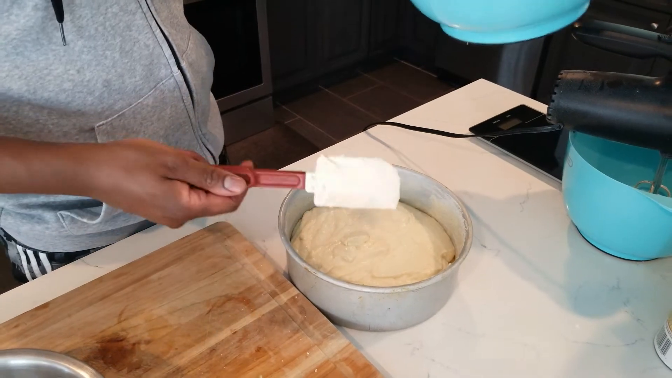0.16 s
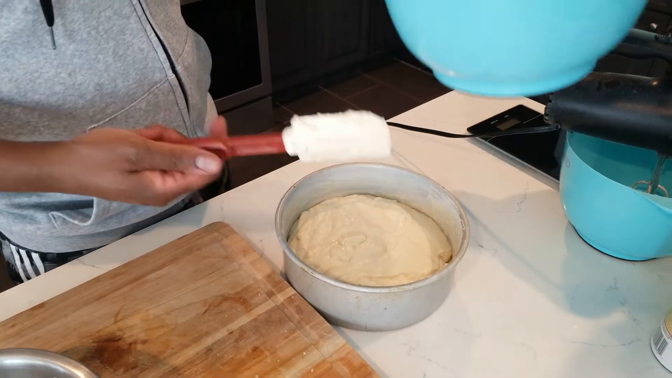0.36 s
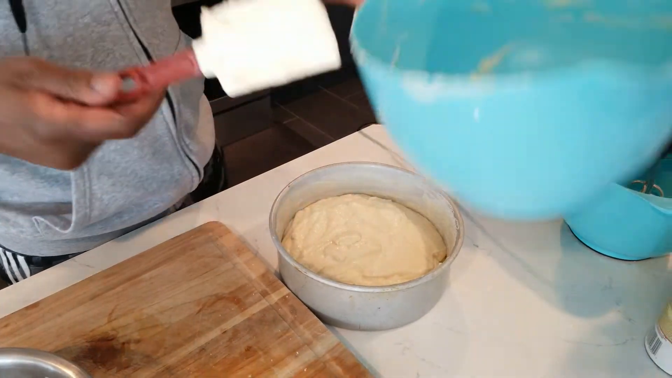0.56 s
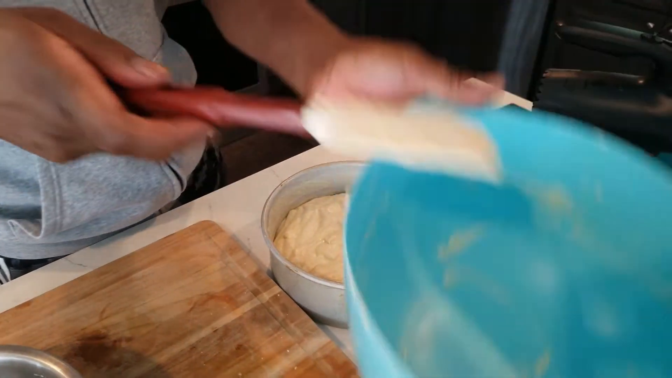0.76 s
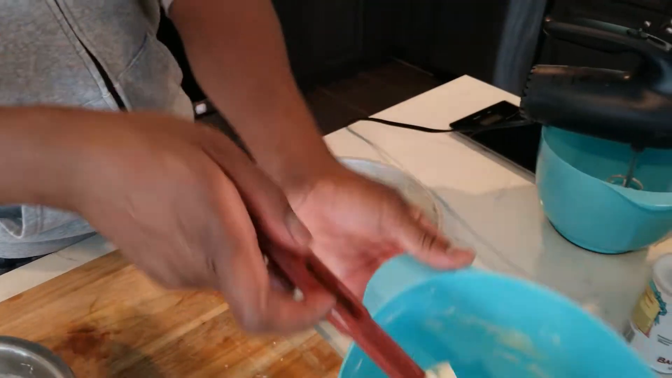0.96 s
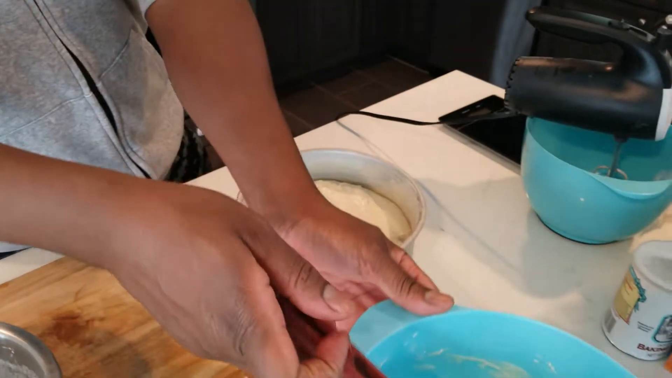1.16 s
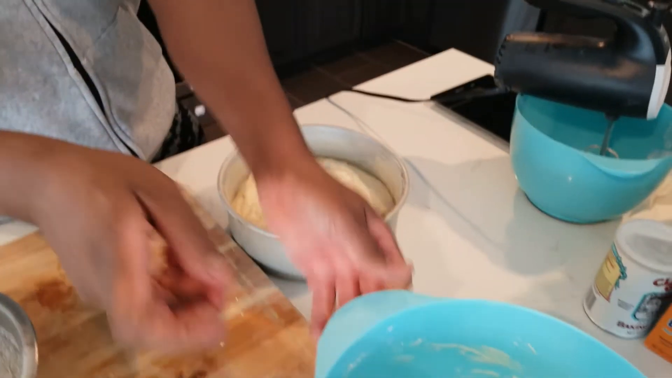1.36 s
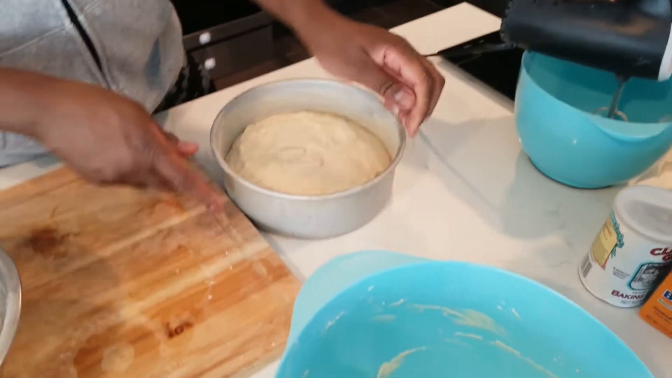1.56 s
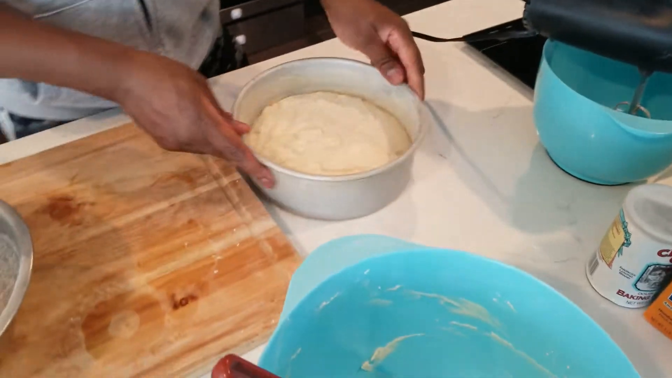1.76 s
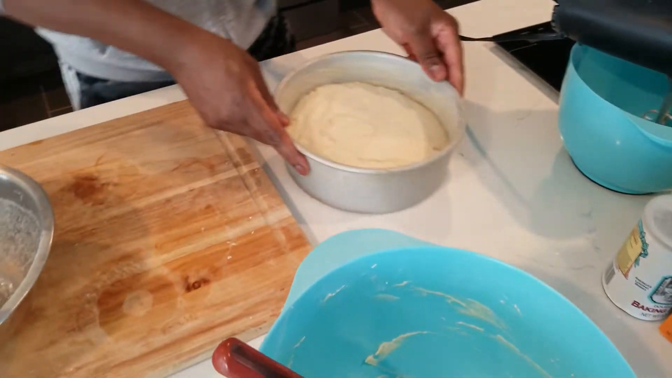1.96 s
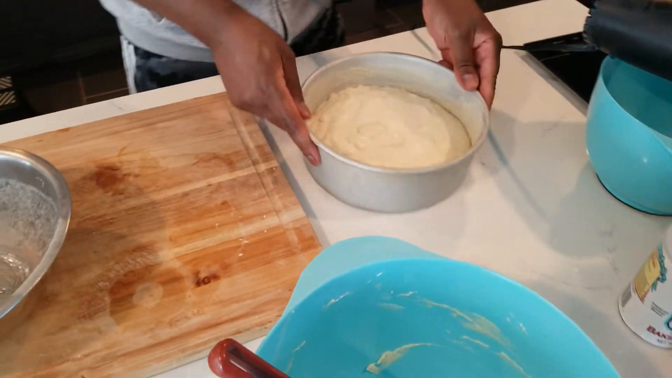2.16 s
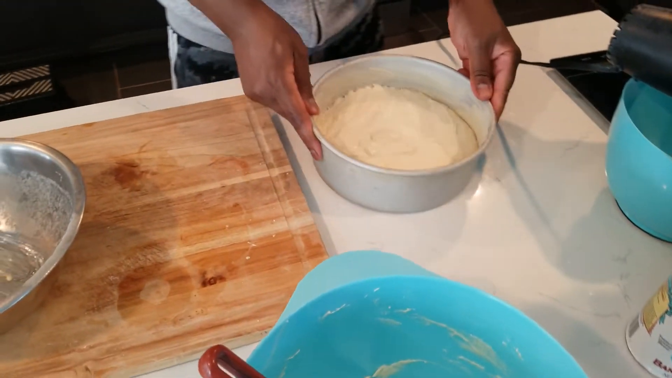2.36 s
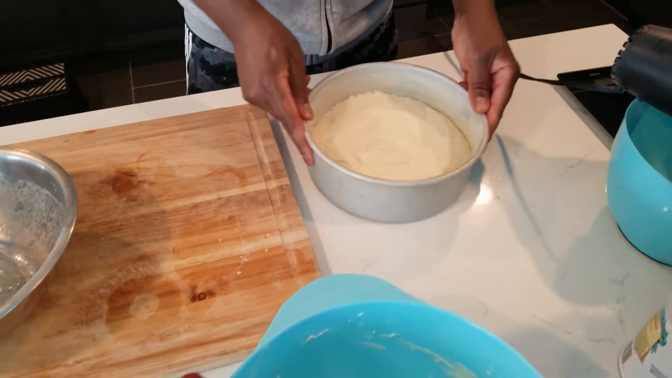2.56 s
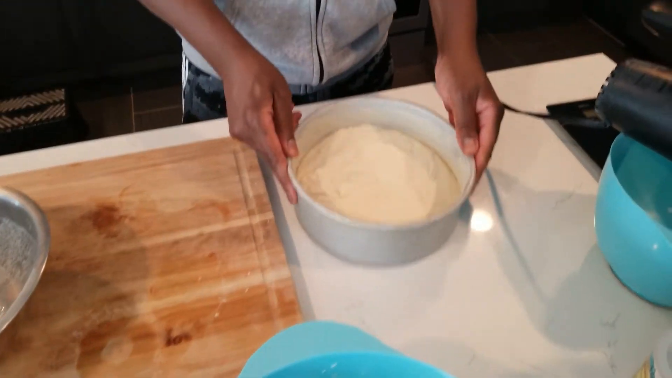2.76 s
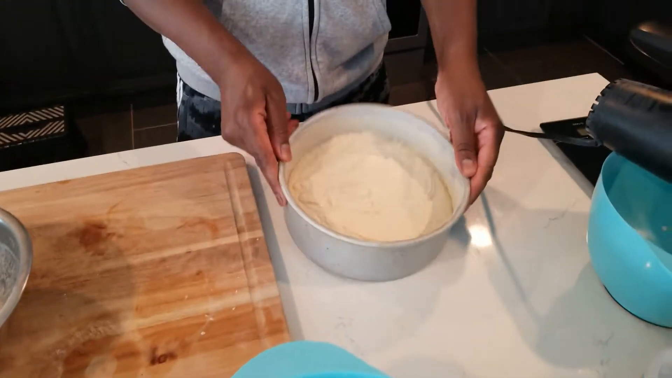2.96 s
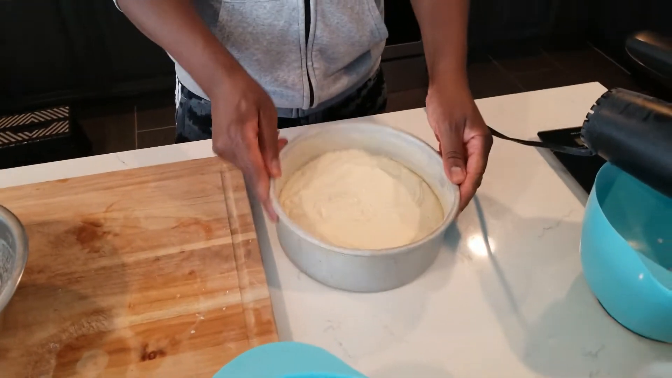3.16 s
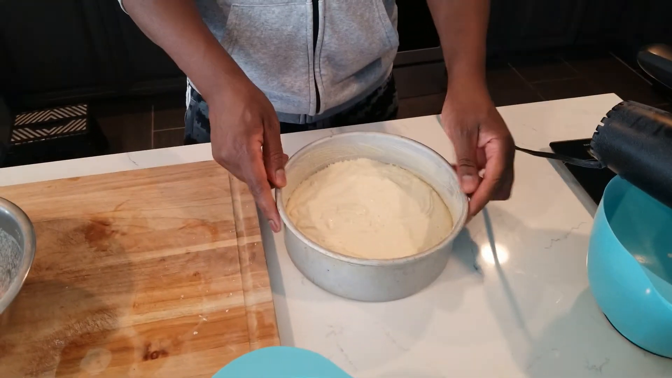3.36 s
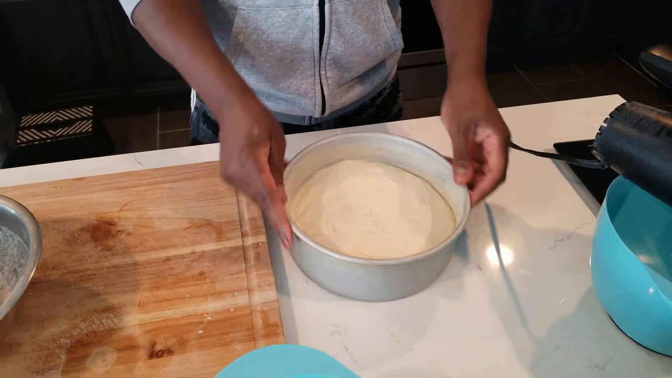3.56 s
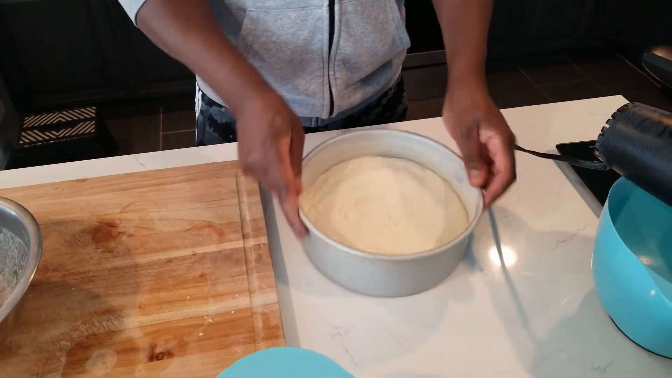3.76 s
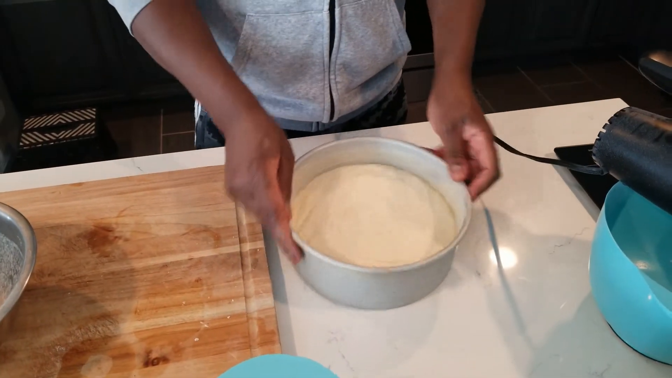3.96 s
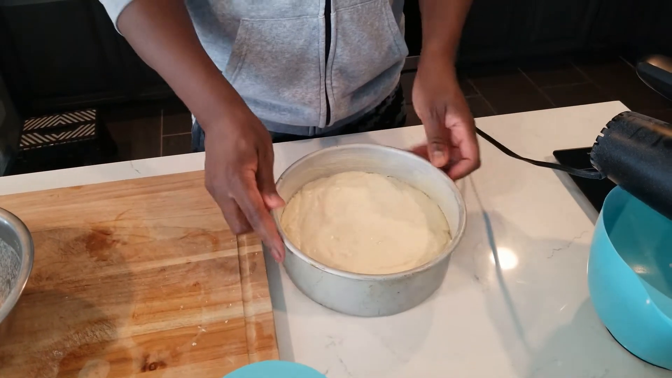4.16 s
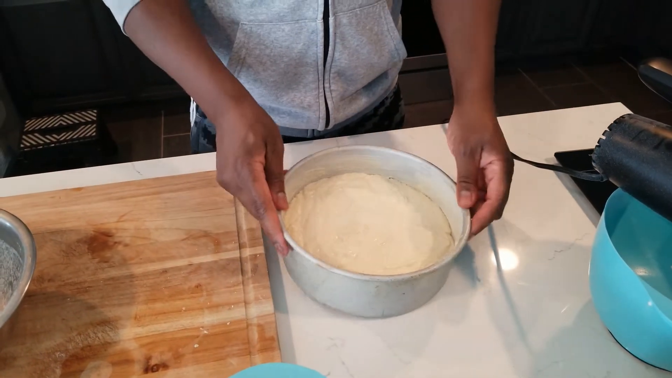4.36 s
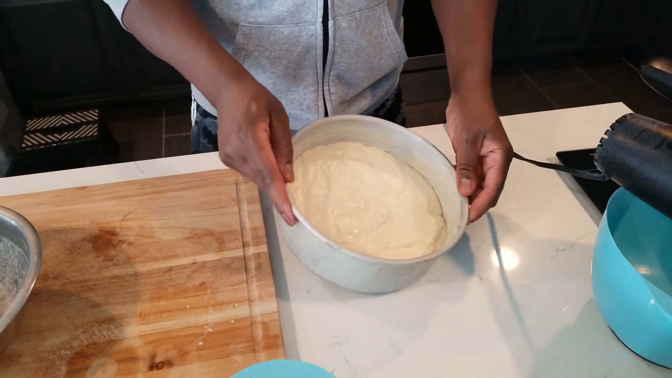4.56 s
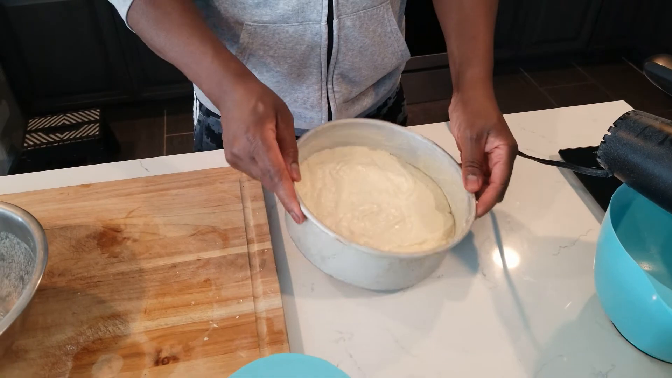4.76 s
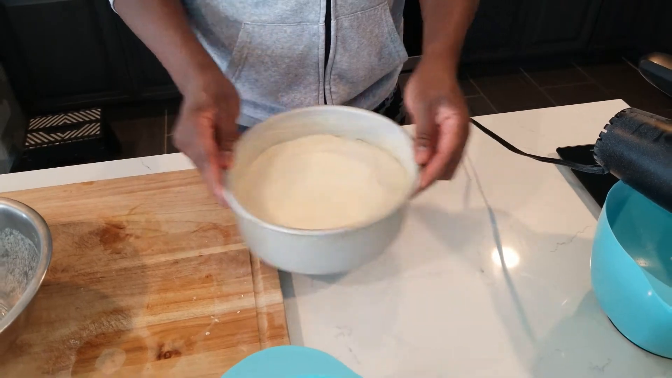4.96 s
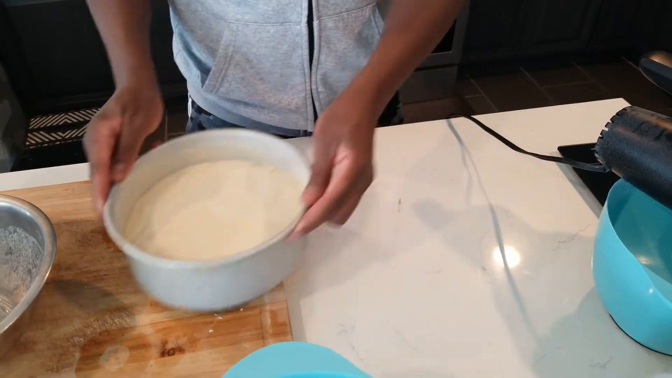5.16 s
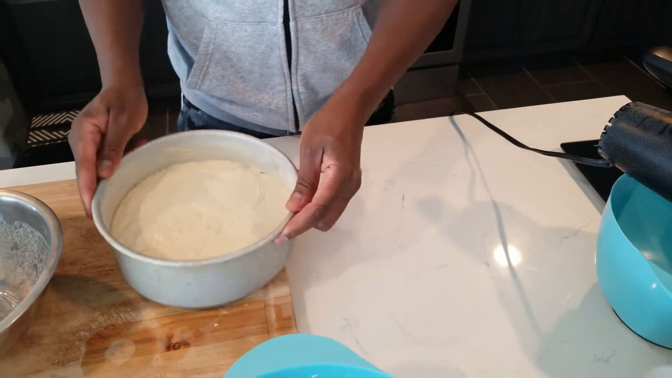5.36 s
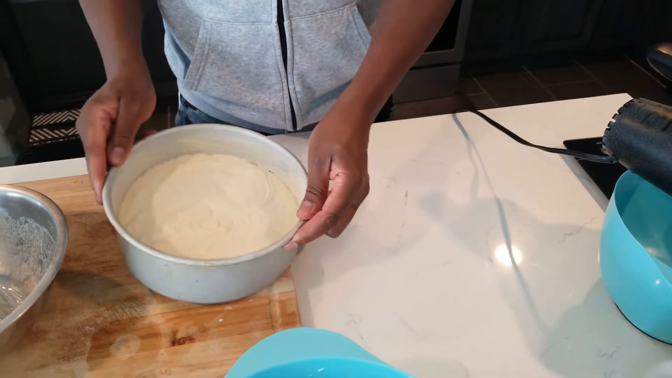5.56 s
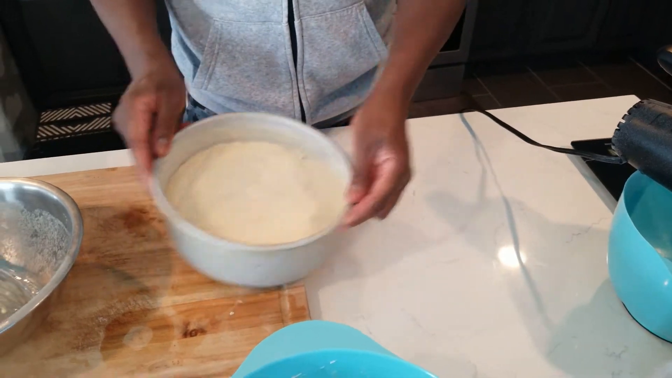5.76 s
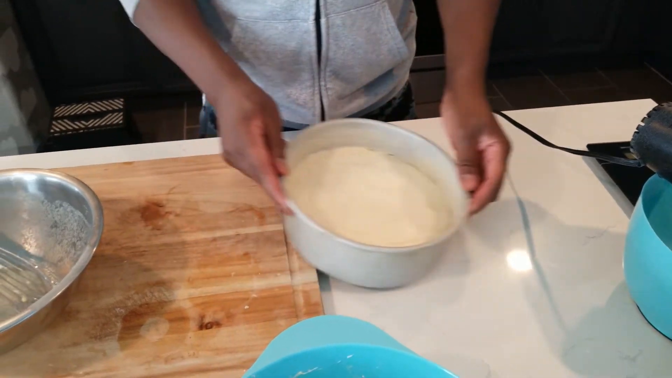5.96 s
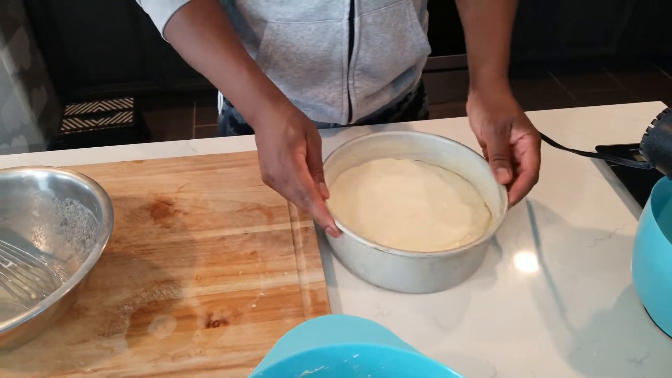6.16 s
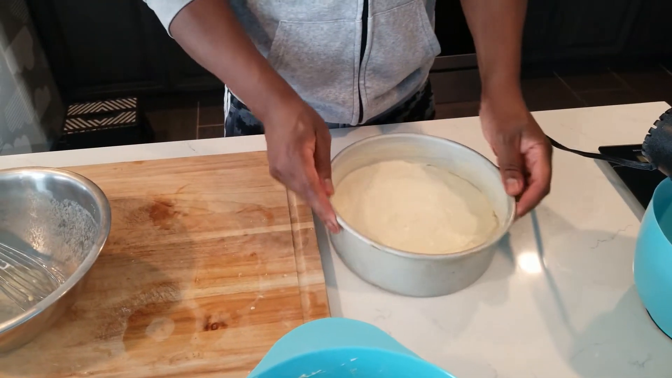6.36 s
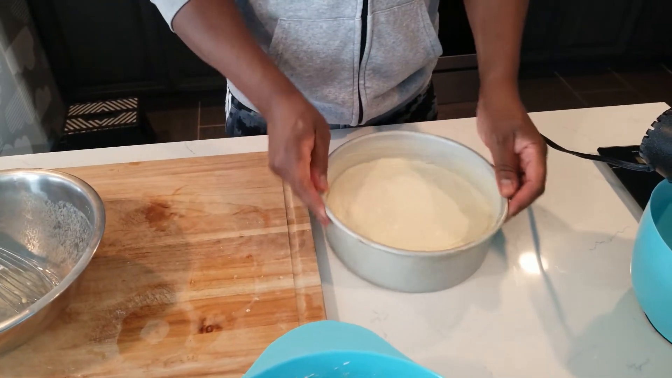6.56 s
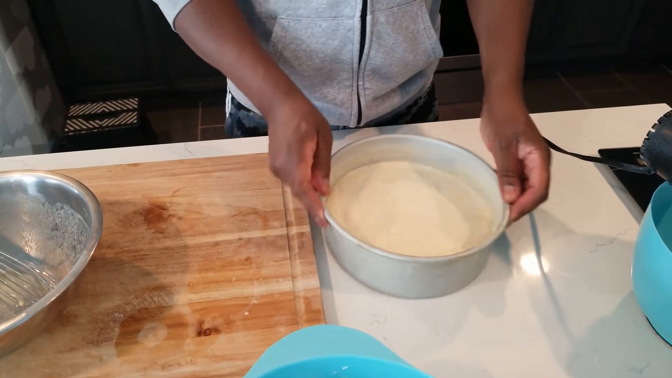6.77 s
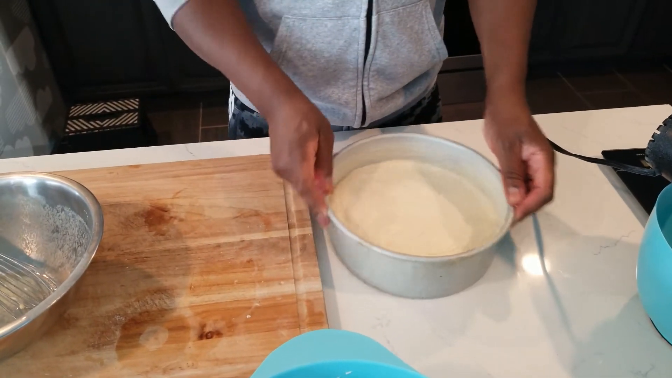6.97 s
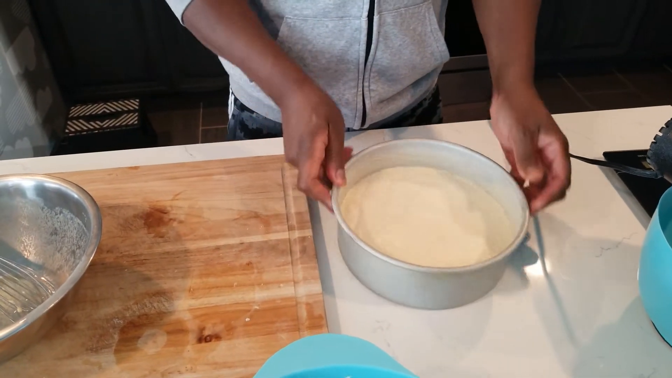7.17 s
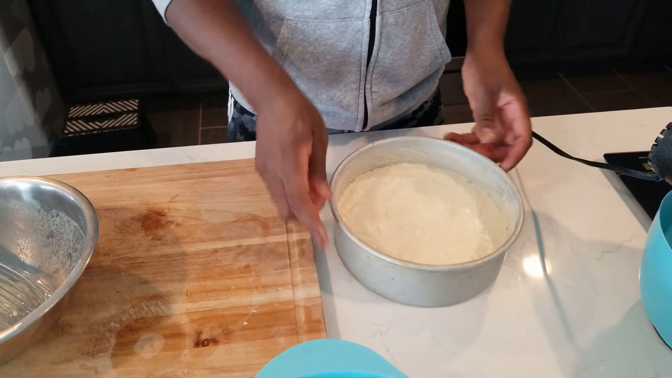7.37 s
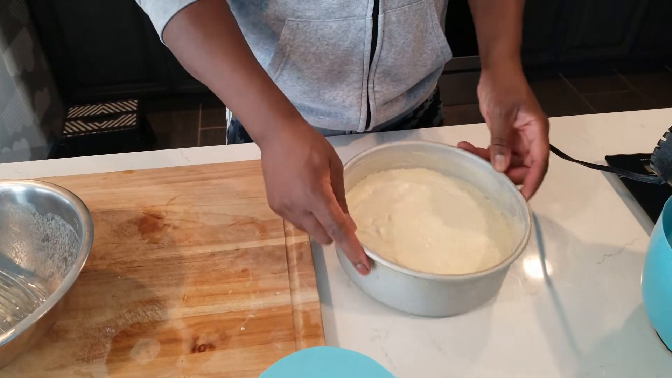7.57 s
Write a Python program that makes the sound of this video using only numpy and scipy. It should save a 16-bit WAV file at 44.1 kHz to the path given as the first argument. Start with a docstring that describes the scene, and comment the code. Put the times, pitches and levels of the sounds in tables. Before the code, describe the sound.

A rubber spatula squeaks softly around a plastic bowl. The bowl is set down with a hollow knock and the spatula drops with a clatter. A metal pan full of batter then slides and knocks sharply on a stone counter, clacks on a wooden board with a brief whisk rattle, and hits the stone again. Heard close up in an echoing kitchen with a faint fridge hum.

```python
"""A hard-walled kitchen, heard in stereo from a phone close to the counter; a fridge hums and whines
faintly throughout. First a rubber spatula sticks and slips round a plastic bowl; the bowl is set down
and the spatula dropped. Then a batter-filled metal pan is slid about, nudged and knocked on the stone
counter. Just after 5 s it lands on a wooden board and a whisk rattles as the board jumps. The pan is
knocked on the stone again and shifted a few last times. Every knock rings on in the room."""
import sys
import numpy as np
from scipy import signal
from scipy.fft import rfft, irfft, next_fast_len
from scipy.io import wavfile
from scipy.ndimage import uniform_filter1d

SR = 44100
rng = np.random.default_rng(int(sys.argv[2]) if len(sys.argv) > 2 else 0)


def store_pcm(level_fs):
    """Save levels as 16-bit WAV."""
    pcm = np.round(np.clip(level_fs, -1, 1) * 32767).astype(np.int16)
    wavfile.write(sys.argv[1], SR, np.atleast_2d(pcm).T)


N = 335160

# hiss of soft things rubbing (skin, cloth, rubber): f/Hz, width/Hz, level/dB
RUB_BANDS = [(3220, 2700, -9.5), (6630, 4900, -9), (9600, 980, 0), (13100, 17000, -5)]


def undb(db):
    """dB to gain."""
    return np.exp(np.asarray(db, float) * np.log(10) / 20)


def unit(x):
    """Scale to rms 1."""
    return x / np.sqrt(np.mean(x ** 2))


def resonate(x, peaks):
    """Pass through a sum of resonances of alternating sign (f/Hz, width/Hz, level/dB)."""
    n = next_fast_len(N)
    f = np.fft.rfftfreq(n, 1 / SR) + 1e-3
    shape = sum((-1) ** k * undb(db) / (1 + 1j * (f - hz ** 2 / f) / width)
                for k, (hz, width, db) in enumerate(peaks))
    return irfft(rfft(x, n) * shape, n)[..., :N]


def wide(mid, side):
    """The phone's two microphones hear alike below 600 Hz and part in the treble."""
    side = signal.sosfilt(signal.butter(2, 600, "high", fs=SR, output="sos"), side)
    return np.array([mid + side, mid - side])


def grit(per_s, spread_db):
    """Random tiny impacts of uneven size."""
    when, sign, size = rng.random((3, N))
    return unit((when < per_s / SR) * np.sign(sign - .5) * undb(-spread_db * np.log(1 - size)))


def strokes(table, attack_s, t60_s):
    """Rows (t/s, length/s, level/dB, ..) as one envelope per level column: rise, hold, die away."""
    t, gains = np.arange(N) / SR, 0
    for start, length, *db in table:
        rise = np.clip((t - start) / attack_s, 0, 1)
        fall = undb(-60 * np.maximum(t - start - length, 0) / t60_s)
        gains = gains + np.outer(undb(db), rise * fall)
    return gains


def ring(modes, t, tilt_db, detune, scatter_db=1.5):
    """Dying sines tilted by tilt_db an octave, peak 1; each blow weights and detunes them anew."""
    hz, db, t60 = np.transpose(modes)[..., None]
    weight, mistune = rng.standard_normal((2, len(modes), 1))
    gain = undb(db + tilt_db * np.log2(hz / 700) + scatter_db * weight)
    sines = np.sin(2 * np.pi * hz * (1 + detune * mistune) * t)
    y = np.sum(gain * sines * undb(-60 * t / t60), axis=0)
    return y / np.abs(y).max()


def blows(hits, modes, contact_s, crack_s, crack_hz, chatter_db, chatter_s, slab_tilt_db):
    """Each blow rings the object and the counter, cracks and chatters; rows: left, right, to the walls."""
    # the stone counter: f/Hz, level/dB, t60/s
    slab_modes = [(43, -22, .4), (95, -10, .1), (145, 0, .11), (190, -5, .07)]
    out, t = np.zeros((3, N + SR)), np.arange(SR // 3) / SR
    treble = signal.butter(1, [2400, crack_hz], "band", fs=SR, output="sos")
    radiation = signal.butter(2, 110.2, "high", fs=SR, output="sos")  # small objects give off little bass
    push = t * np.exp(-t / contact_s)  # a contact of finite length dulls the ring
    click = signal.sosfilt(treble, np.arange(len(t)) == 0) * np.sqrt(crack_s * SR / 2)
    settling, fade = np.exp(-t / chatter_s), np.cos(np.pi / 2 * t / t[-1])
    for start, ring_db, thud_db, crack_db, balance_db, *tilt_db in hits:
        noise = rng.standard_normal((4, len(t)))
        body = signal.fftconvolve(ring(modes, t, sum(tilt_db), detune=.015), push / push.sum())
        body = signal.sosfilt(radiation, body[:len(t)])
        chatter = wide(*signal.fftconvolve(body[None], noise[:2] * settling, axes=1)[:, :len(t)])
        chatter *= undb(chatter_db) / np.abs(chatter).max()
        thud = ring(slab_modes, t, slab_tilt_db, detune=.01)
        thud *= 1 - np.exp(-t / 0.008)  # the heavy slab takes a moment to move
        crack = signal.sosfilt(treble, noise[2:] * (np.exp(-t / crack_s) + 0.13 * settling))
        solid = undb(ring_db) * body + undb(thud_db) * thud
        near = solid + undb(ring_db) * chatter + undb(crack_db) * crack
        near *= undb([[balance_db / 2], [-balance_db / 2]])
        far = solid + undb(crack_db + 0.5) * click  # summed over all directions the crack is an even click
        i = int(start * SR)
        out[:, i:i + len(t)] += np.vstack([near, far]) * fade
    return out[:, :N]


def fridge():
    """Steady broad noise with a wavering hum and a thin whine that throbs once per turn of the motor."""
    # shape of the noise: f/Hz, relative level/dB
    spectrum = [(18, -35.5), (30, 5.5), (75, 3), (280, -3.5), (374, -8), (740, -14), (889, -23.5),
                (2900, -35.5), (4420, -26.5), (5450, -33.5), (9460, -36.5), (12600, -29), (16000, -39.5)]
    # the hum: f/Hz, level/dB, pitch wander as a share
    hum_tones = [(199.5, -68.5, 0.0054)]
    # the motor's whine: multiple of the shaft rate, level/dB
    harmonics = [(83, -97), (84, -91), (85, -81), (86, -91), (87, -89), (88, -97), (89, -96), (90, -96)]
    shaft_hz, t, n = 51.92, np.arange(N) / SR, next_fast_len(N)
    band_hz, band_db = np.transpose(spectrum)
    shape = undb(np.interp(np.log(np.fft.rfftfreq(n, 1 / SR) + 1), np.log(band_hz), band_db))
    noise = irfft(rfft(rng.standard_normal((2, n))) * shape, n)[:, :N]
    wander = unit(uniform_filter1d(rng.standard_normal(N), int(0.032 * SR)))
    hum = sum(undb(db) * np.sin(2 * np.pi * np.cumsum(hz * (1 + share * wander)) / SR)
              for hz, db, share in hum_tones)
    whine = sum(undb(db) * np.cos(2 * np.pi * k * shaft_hz * t) for k, db in harmonics)
    return undb(-60) * wide(*unit(noise)) + np.sqrt(2) * (hum + whine) * undb([[1.5], [-1.5]])


def slide():
    """Grit under the pan or bowl grinds unevenly, skin and cloth swish, the counter rumbles."""
    # shifts across the counter: t/s, length/s, grind/dB, swish/dB, rumble/dB
    shifts = [(0, 0.038, -59, -71, -59), (1.12, 0.23, -50, -59.5, -51), (1.62, 0.29, -59, -63, -60),
              (1.93, 0.18, -56, -63.5, -54), (2.18, 0.56, -58.5, -62.5, -53), (2.8, 0.31, -65, -71, -60),
              (3.48, .16, -52.5, -65, -52), (3.69, 0.032, -49.5, -69, -57), (3.8, 0.25, -54.5, -68, -57.5),
              (4.1, 0.22, -74, -67.5, -73), (4.33, 0.066, -56, -80, -63), (5.98, 0.092, -54, -83, -49),
              (6.48, 0.4, -59, -70.5, -58.5), (6.92, 0.11, -56, -79, -50.5),
              (7.07, 0.22, -61.5, -68, -73.5), (7.49, 0.14, -54.5, -68, -57.5)]
    # fingers and sleeves brushing past: t/s, length/s, level/dB
    brushes = [(1.3, 0.033, -80), (1.72, .08, -62), (2.21, 0.036, -65), (2.48, 0.038, -69),
               (2.73, 0.027, -62), (3.51, 0.026, -68), (3.6, 0.044, -75), (3.69, 0.13, -68),
               (3.8, 0.048, -67), (3.99, .07, -62.5), (4.33, 0.037, -63), (6.6, 0.033, -69),
               (6.7, 0.044, -75), (7.29, 0.11, -64)]
    # resonances of the grinding and of the counter: f/Hz, width/Hz, level/dB
    grind_bands = [(155, 300, -2), (454, 535, -0.5), (750, 275, 4), (1227, 1090, -9), (2480, 4700, -23.5)]
    rumble_bands = [(49.3, 23, 5.5), (106.3, 13, -1), (147, 62, -9)]
    uneven_db = 1.5 * unit(uniform_filter1d(rng.standard_normal((3, N)), int(.04 * SR), axis=1))
    grind, swish, rumble = strokes(shifts, attack_s=0.014, t60_s=0.43) * undb(uneven_db)
    swish += strokes(brushes, attack_s=0.027, t60_s=0.13)[0]
    rough = wide(*(unit(resonate(grit(2500, 2.1), grind_bands)) for _ in range(2)))
    soft = np.array([unit(resonate(grit(4000, 2.4), RUB_BANDS)) for _ in range(2)])
    low = unit(resonate(rng.standard_normal(N), rumble_bands))
    return grind * rough + swish * soft + rumble * low


def spatula_scrape():
    """The rubber blade sticks and slips: bursts of squeak, low pulses in the bowl's wall, a soft hiss."""
    # strokes round the bowl: t/s, length/s, squeak/dB, wall/dB, hiss/dB
    scrapes = [(.28, 0.091, -77, -63.5, -84), (.595, 0.2, -71, -55, -70.5), (.742, 0.13, -74.5, -48.5, -70),
               (.91, 0.18, -76, -59.5, -75)]
    # sudden slips of the blade: t/s, level/dB
    slip_times = [(.31, -64), (.335, -65), (0.374, -64), (0.602, -64.5), (0.634, -56.5), (0.676, -50.5),
                  (0.715, -48.5), (.805, -54), (0.818, -45), (0.861, -49.5)]
    # resonances of the squeak and of the plastic wall: f/Hz, width/Hz, level/dB
    squeak_bands = [(1624, 174, 13), (1940, 350, 10), (2430, 680, 6.5), (3170, 390, 1)]
    wall_bands = [(140, 44, 4.5), (433, 110, 5.5), (840, 1100, -9)]
    t, judder_per_s = np.arange(N) / SR, 80
    squeak, wall, hiss = strokes(scrapes, attack_s=0.026, t60_s=0.1)
    slips = sum(undb(db) * np.exp(-((t - s) / .006) ** 2) for s, db in slip_times)
    bursts = (squeak + slips) * unit(resonate(rng.standard_normal(N), squeak_bands))
    spacing, force = rng.standard_normal((2 * judder_per_s, 2)).T
    push_times = np.cumsum(np.exp(.25 * spacing)) / judder_per_s
    pushes = np.zeros(N)  # one-sided, nearly even, as the blade lets go
    pushes[(push_times * SR).astype(int)] = undb(4.5 * force)
    soften = int(0.00044 * SR)  # the rubber edge lets go softly
    judder = resonate(uniform_filter1d(uniform_filter1d(pushes, soften), soften), wall_bands)
    drumming = (wall + undb(-17.5) * slips) * judder / np.std(judder[:SR])
    return bursts + drumming + hiss * unit(resonate(rng.standard_normal((2, N)), RUB_BANDS))


def bowl_down():
    """The plastic bowl meets the counter with a short, hollow knock."""
    # contacts: t/s, ring/dB, thud/dB, crack/dB, left minus right/dB
    hits = [(1.02, -38, -51.5, -55.5, -0.77), (1.052, -1.5, -23.5, -26.5, 0.7),
            (1.312, -22, -43.5, -50, -0.8)]
    # the bowl: f/Hz, level/dB, t60/s
    modes = [(299, -43, 0.078), (381, -24, 0.065), (400, -10.5, 0.012), (518, 5.5, 0.026),
             (802, -13, 0.037), (1078, -17, 0.02), (1717, -3, 0.0073), (2030, 0, 0.0071), (2700, -8, 0.011),
             (3330, -39.5, 0.0057)]
    return blows(hits, modes, contact_s=.00005, crack_s=0.0009, crack_hz=10190,
                 chatter_db=0, chatter_s=0.0057, slab_tilt_db=6)


def pan_on_stone():
    """The full pan rings briefly: softly under bumps and finger taps, sharply when knocked on stone."""
    # contacts: t/s, ring/dB, thud/dB, crack/dB, left minus right/dB, brightness/(dB per octave)
    nudges = [(1.296, -21, -30.5, -43.5, 3, 1), (1.637, -51, -40, -47.5, 7, 1),
              (2.179, -42, -30.5, -55, 3, -12), (2.229, -34, -34.5, -52, 3, 0),
              (2.63, -41, -30, -65, -1.8, -5), (2.746, -40, -51.5, -48.5, 2, 0),
              (3.67, -28.5, -28, -75, 1.5, 0), (3.894, -33, -33, -66.5, 1.5, -9),
              (4.337, -51, -27.5, -49, 1, 0), (4.395, -30.5, -27, -55, 2.5, 0),
              (5.978, -34.5, -23, -68.5, 2.5, 1), (6.033, -45.5, -22.5, -73.5, 2, 0),
              (6.621, -29.5, -29.5, -67.5, 1.6, 1), (6.82, -36.5, -32.5, -73, 1.5, 0),
              (7.004, -26.5, -33, -63, -2, 1), (7.503, -34.5, -33, -59, 2.4, 0),
              (7.586, -27, -50, -69, 0, 0)]
    knocks = [(3.002, -6.5, -12, -27.5, 1.5, -5.5), (3.011, -5, -47, -32.5, 0.5, 11),
              (3.040, -3, -31, -15, 1, -2.5), (3.052, 1, -9, -27, 3, -7.5),
              (3.213, -10.5, -10.5, -15, 5.5, 15.5), (3.220, 3.5, -33.5, -35, -0.5, -9.5),
              (4.498, -5.5, -19, -29, 2, 13), (4.617, -13, -24, -50, 0.5, 8.5),
              (6.188, -6, -34, -21.5, 0, -8), (6.195, 4.5, -11, -34.5, 3.5, -11),
              (6.296, -6, -19, -31, 5.5, -8), (6.304, -20.5, -46, -47, 1.5, -1)]
    # the batter-filled pan: f/Hz, level/dB, t60/s
    modes = [(402, -9, 0.063), (498.4, -5, 0.074), (650, 2, 0.024), (766.4, 7, 0.039), (891, 12.5, 0.014),
             (1025, 15, 0.014), (1260, 4, 0.023), (1650, -8, 0.024), (2000, -12.5, 0.0081),
             (2376, -28.5, 0.013), (3240, -35.5, 0.0041)]
    light = blows(nudges, modes, contact_s=.0001, crack_s=0.00342, crack_hz=12000,
                  chatter_db=-4, chatter_s=0.018, slab_tilt_db=1.5)
    hard = blows(knocks, modes, contact_s=.00004, crack_s=0.0016, crack_hz=10000,
                 chatter_db=-4, chatter_s=.012, slab_tilt_db=0.26)
    return light + hard


def spatula_drop():
    """The dropped spatula bounces and rings with a bright clatter."""
    # contacts: t/s, ring/dB, thud/dB, crack/dB, left minus right/dB
    hits = [(1.412, -2.5, -50, -19.5, 0), (1.424, -5.5, -25.5, -42.5, -5), (1.47, -17, -46, -63.5, 5.7),
            (1.932, -29.5, -60, -30.5, 2)]
    # the spatula: f/Hz, level/dB, t60/s
    modes = [(362.4, -36, 0.035), (556, 3.5, 0.14), (717.6, -0.5, 0.16), (878, 1, 0.077), (1153, 1.5, 0.1),
             (1356, 0, 0.03), (1636, 7.5, 0.024), (1840, 5.5, 0.017), (2044, -6, 0.1), (2136, 8, 0.034),
             (2410, 13.5, 0.01), (2910, 1.5, 0.014), (3350, 2.5, 0.0072), (4160, -6, 0.0055)]
    return blows(hits, modes, contact_s=.00003, crack_s=0.00061, crack_hz=10000,
                 chatter_db=-7, chatter_s=.014, slab_tilt_db=5.1)


def pan_on_board():
    """The pan strikes the wooden board: dry clacks that die within hundredths of a second."""
    # contacts: t/s, ring/dB, thud/dB, crack/dB, left minus right/dB
    hits = [(5.250, -1.5, -34, -8.5, 2.5), (5.257, 2.5, -17, -41.5, 4.5), (5.262, -12.5, -23, -33, -7),
            (5.279, -8.5, -50, -28.5, -5), (5.443, -1.5, 0.5, -12, 3.5), (5.448, 5.5, -8.5, -3.5, -1.5),
            (5.461, -21.5, -21.5, -50.5, 2), (5.687, -21, -25, -58, 2)]
    # the board under the pan: f/Hz, level/dB, t60/s
    modes = [(252, -17, 0.012), (333, -8.5, 0.018), (480, 2.5, 0.0097), (584, -16.5, 0.048),
             (730, -2.5, 0.033), (894, 3.5, 0.0093), (1150, 15, 0.0035), (1730, 3, 0.0034),
             (2153, -6, 0.005), (2570, -9.5, 0.0065), (3190, -15, 0.0095)]
    return blows(hits, modes, contact_s=.00004, crack_s=0.00074, crack_hz=4580,
                 chatter_db=-7.5, chatter_s=0.013, slab_tilt_db=-2.8)


def whisk():
    """Thin wires buzz against a steel bowl, left of the phone."""
    # the rattle as the board jumps: t/s, length/s, level/dB
    rattle = [(5.48, 0.063, -41.5)]
    # resonances of the wires: f/Hz, width/Hz, level/dB
    wire_bands = [(6300, 200, -5), (6780, 160, 0), (7300, 250, -3), (8800, 350, -7), (10300, 250, -5),
                  (12000, 6000, -13), (15300, 1200, -10)]
    buzz = unit(resonate(np.array([grit(2500, 2.5), grit(2500, 2.5)]), wire_bands))
    return strokes(rattle, attack_s=.008, t60_s=0.17)[0] * buzz * undb([[3], [-4]])


def kitchen(x):
    """Dense echoes off hard walls build up in a few ms and die faster in the treble."""
    # ring of the room: f/Hz, t60/s, relative level/dB
    bands = [(59.8, 0.61, 3), (149, 0.62, -1.5), (410, 0.51, 5.5), (1000, 0.59, 2), (2500, 0.55, 5),
             (5850, 0.53, 1), (12000, 0.4, 3)]
    f, t, noise = signal.stft(rng.standard_normal((2, int(1.2 * SR))), SR, nperseg=512)
    hz, *columns = np.transpose(bands)
    t60, db = (np.interp(np.log(f + 1), np.log(hz), column)[:, None] for column in columns)
    tail = signal.istft(noise * undb(db - 60 * t / t60), SR)[1]
    tail *= 1 - np.exp(-np.arange(tail.shape[1]) / SR / 0.0062)
    tail = wide(*tail) / np.sqrt(np.sum(tail[0] ** 2))
    return undb(-2.5) * signal.fftconvolve(tail, x[None], axes=1)[:, :N]


def scene():
    """Close knocks and scrapes with their echoes, over sliding and the fridge."""
    rubs = spatula_scrape()
    bowl = bowl_down() + spatula_drop()
    pan = pan_on_stone() + pan_on_board()
    wires = whisk()
    near = rubs + bowl[:2] + pan[:2] + wires
    lag_s = 0.000048  # the right microphone hears the counter a little later
    near[1] = np.interp(np.arange(N) - lag_s * SR, np.arange(N), near[1])
    # the bowl is nearer the phone than the pan, so its echoes count for less
    to_walls = undb(-2) * (rubs.mean(axis=0) + bowl[2]) + pan[2] + wires.mean(axis=0)
    return near + kitchen(to_walls) + slide() + fridge()


def record(dry):
    """The phone drops the deepest bass, rounds the loudest peaks and cuts the top."""
    y = signal.sosfilt(signal.butter(6, 38, "high", fs=SR, output="sos"), dry)
    y = y / (1 + (y / .95) ** 4) ** .25
    return signal.sosfilt(signal.ellip(10, .2, 80, 16200, fs=SR, output="sos"), y)


dry = scene()
out = record(dry)
store_pcm(out)
```